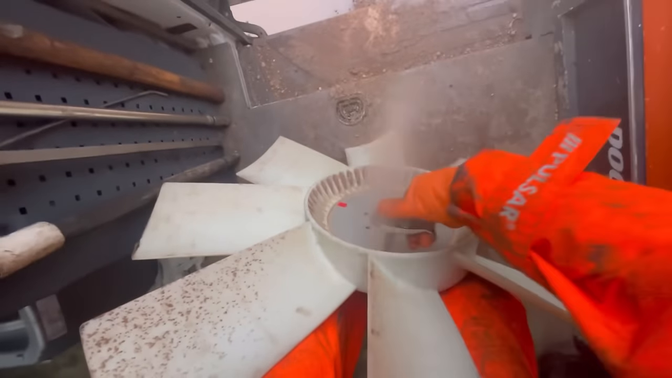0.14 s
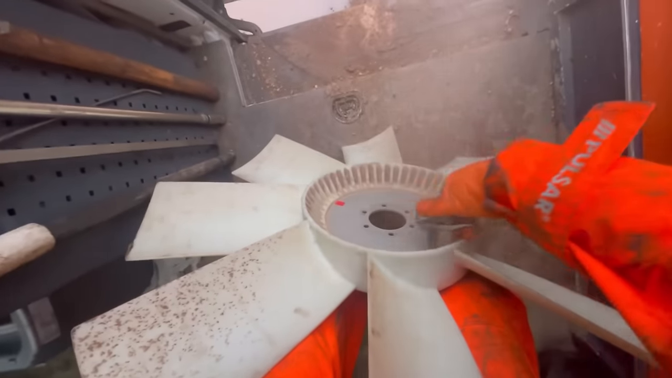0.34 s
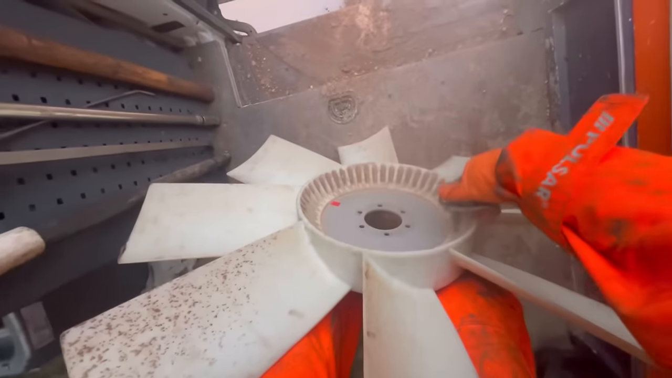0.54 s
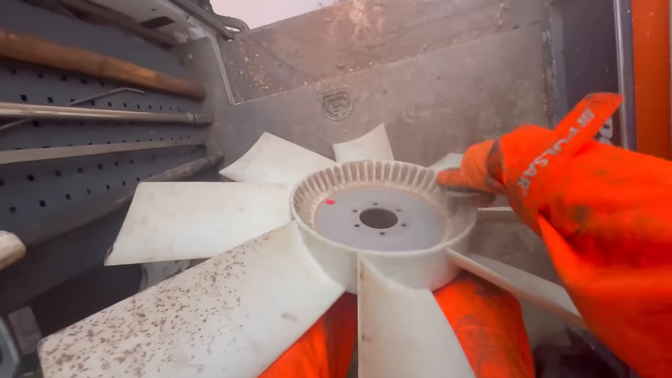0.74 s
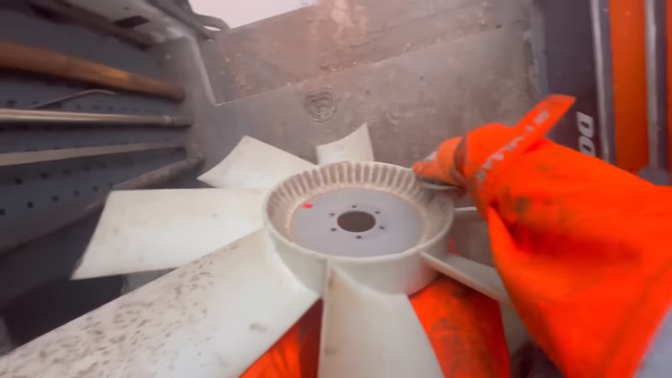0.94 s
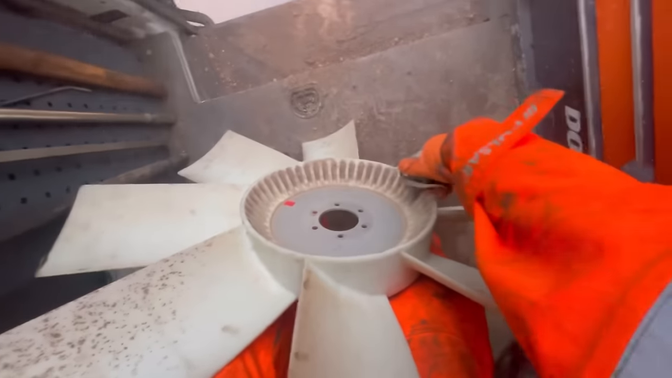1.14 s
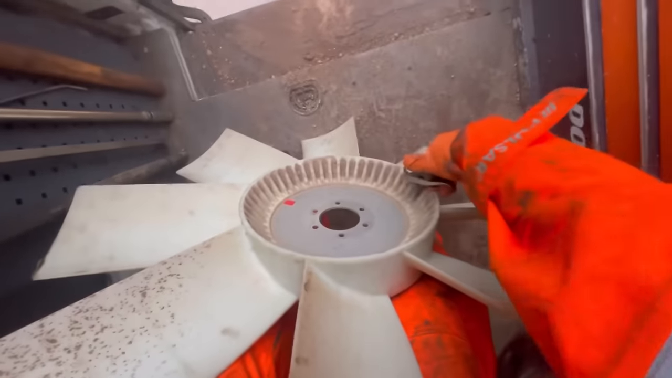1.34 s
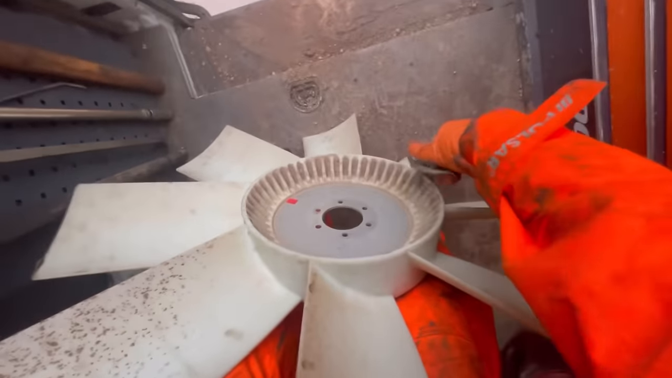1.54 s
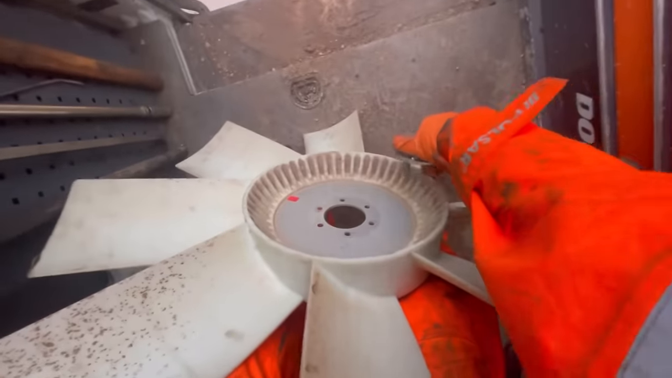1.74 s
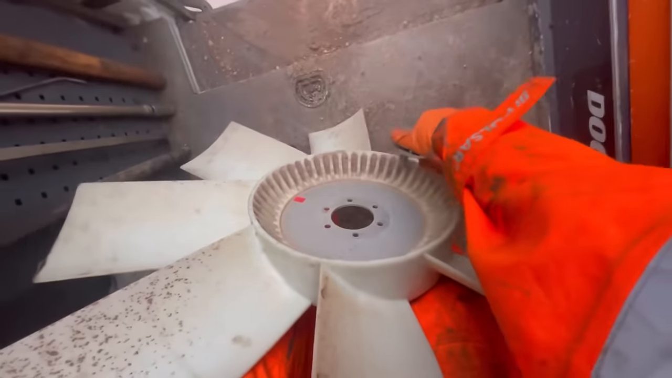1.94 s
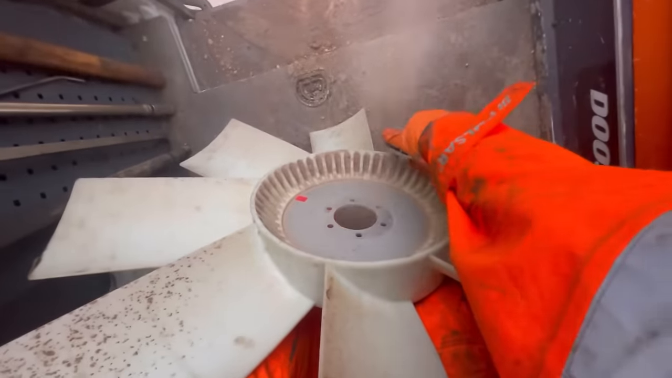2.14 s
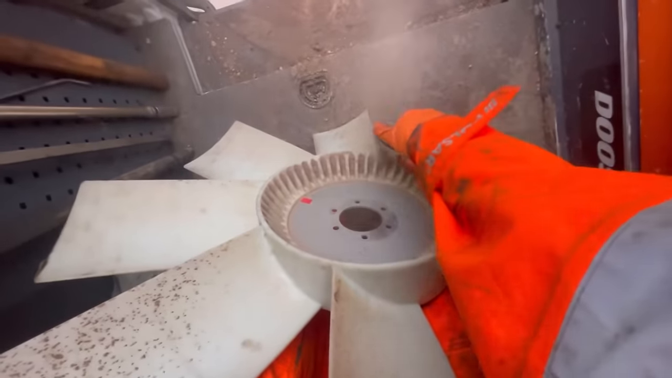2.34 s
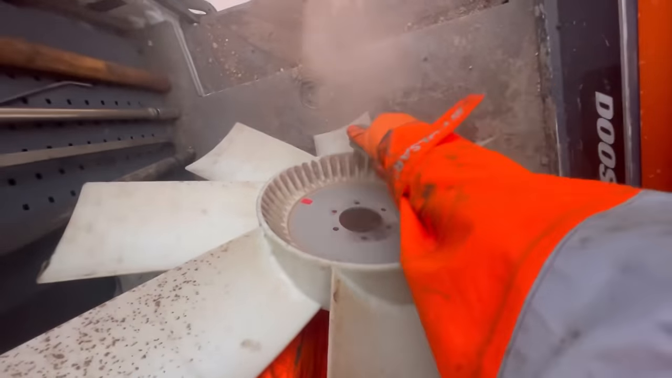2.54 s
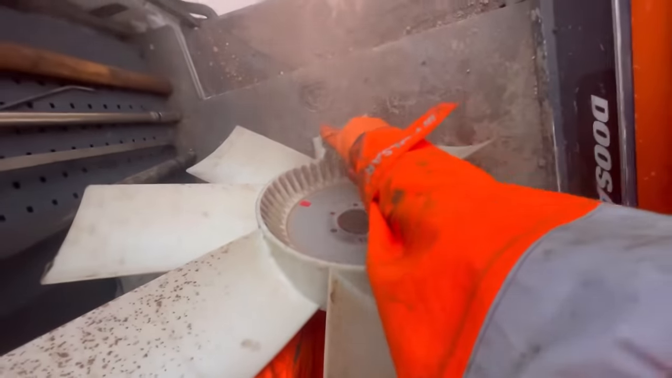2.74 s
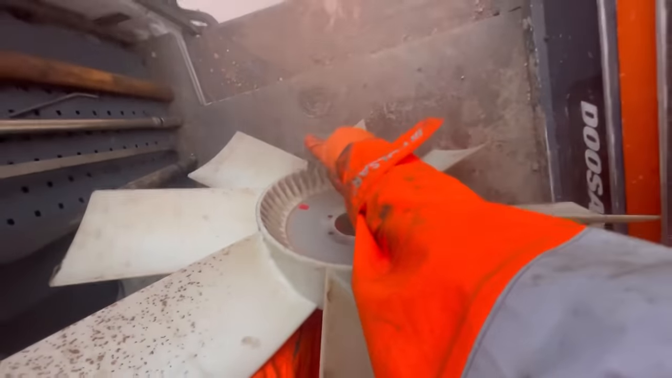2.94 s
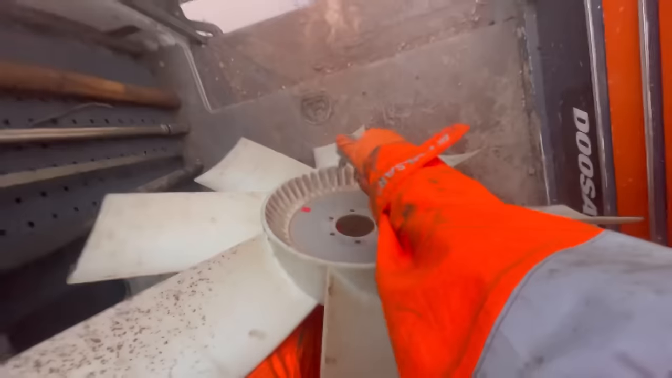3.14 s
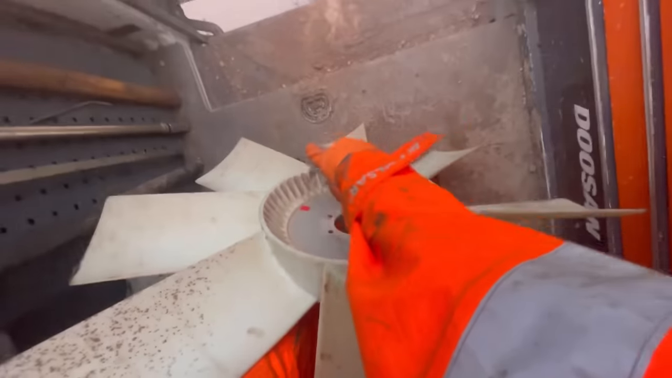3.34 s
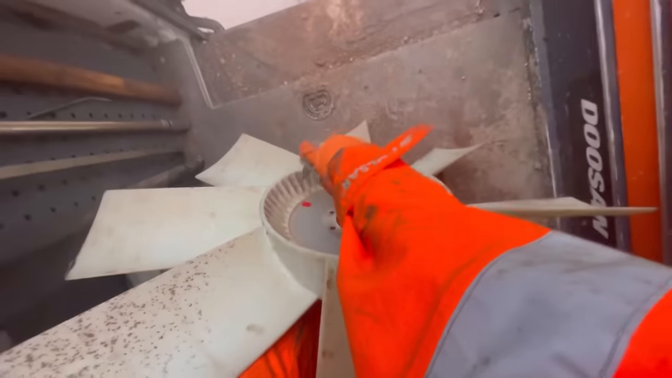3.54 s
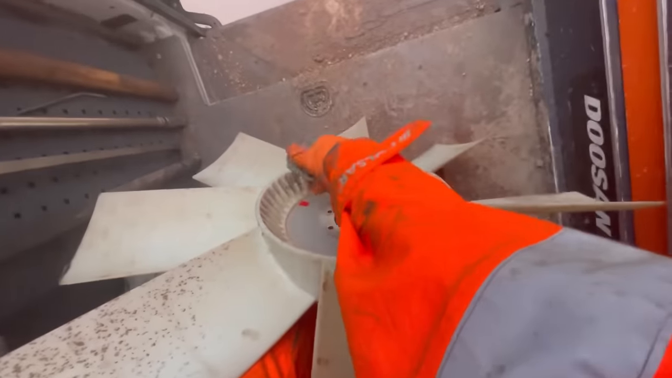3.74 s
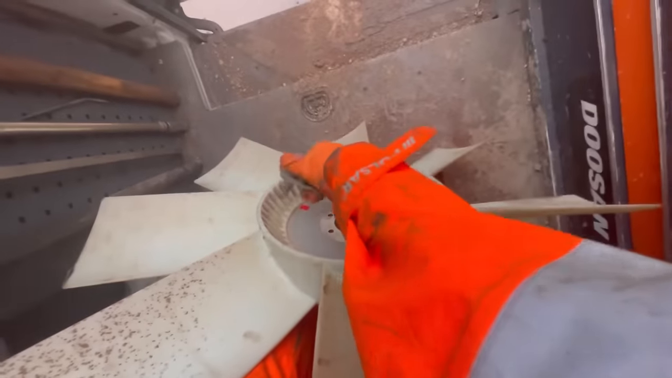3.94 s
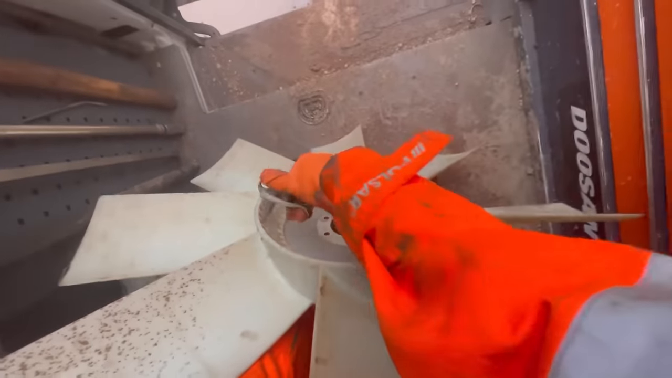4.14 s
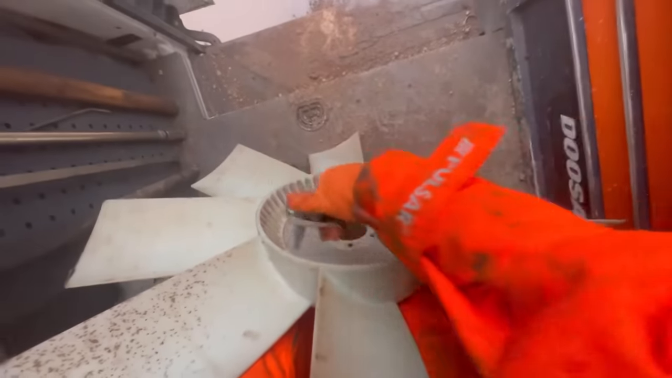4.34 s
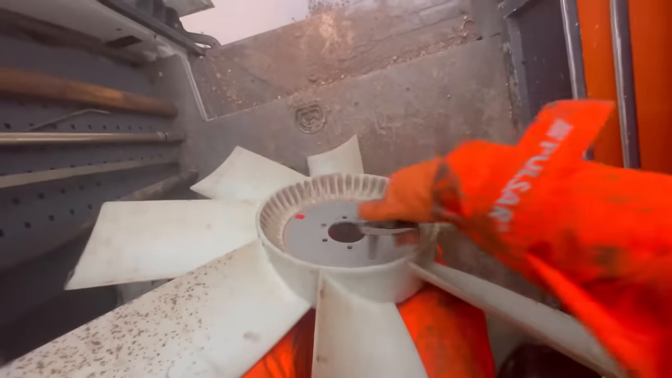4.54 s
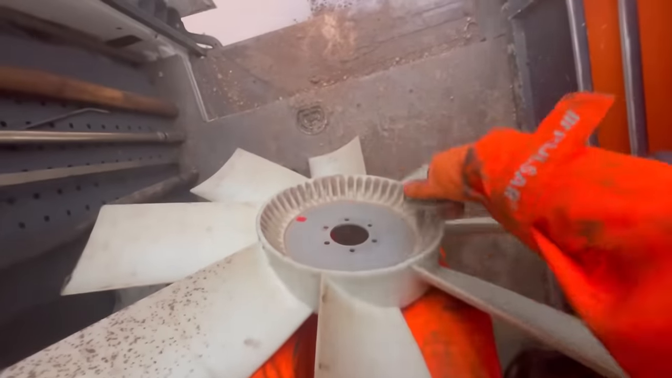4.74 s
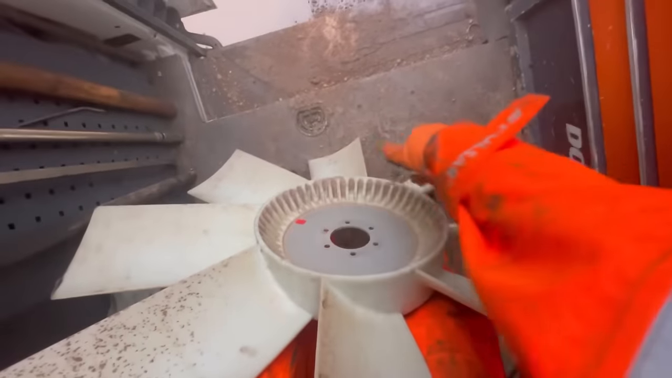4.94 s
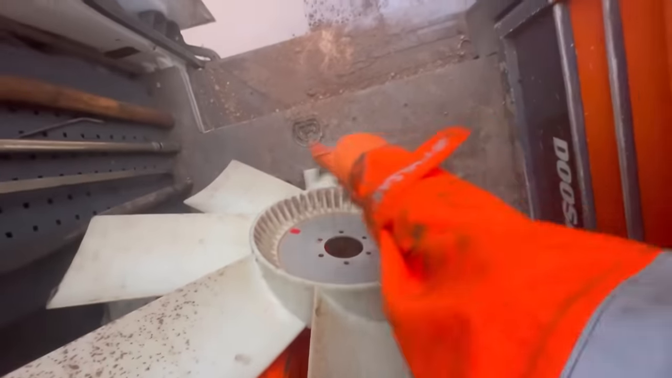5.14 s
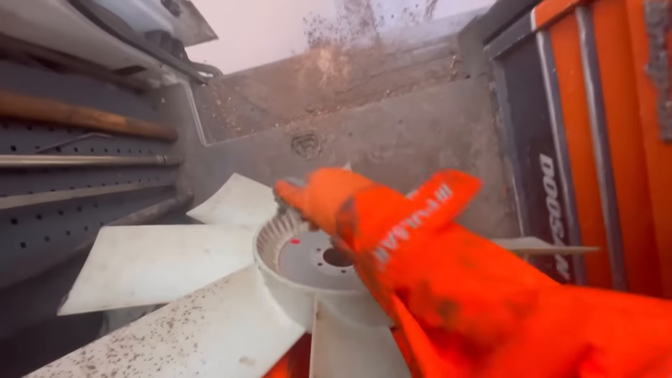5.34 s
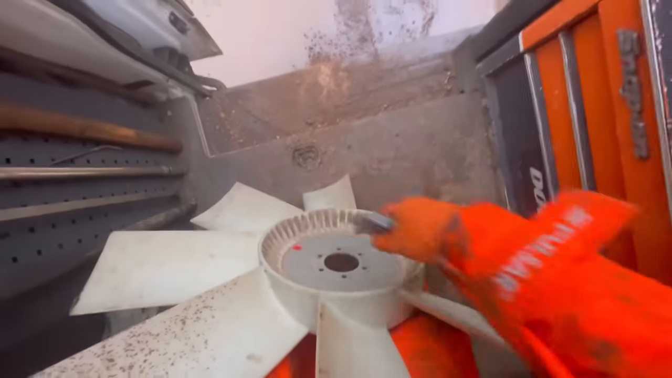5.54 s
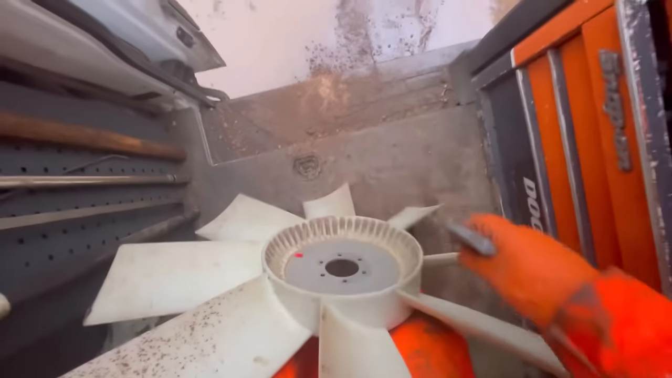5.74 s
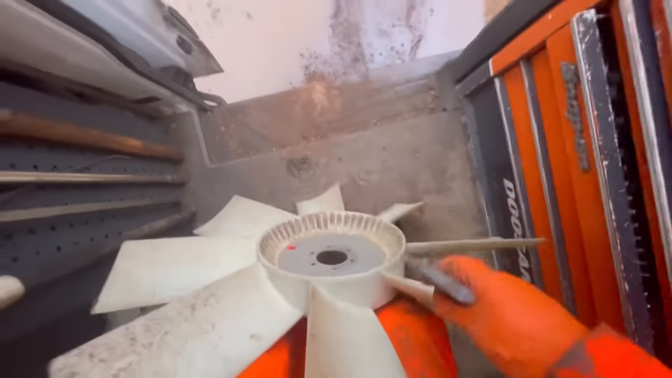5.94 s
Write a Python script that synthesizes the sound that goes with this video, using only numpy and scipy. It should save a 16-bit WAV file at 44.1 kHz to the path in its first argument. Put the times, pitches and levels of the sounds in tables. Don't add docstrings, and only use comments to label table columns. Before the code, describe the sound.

A compressed-air gun is already blowing at the start, close to a stereo microphone inside a small, hard-walled van. Until about 0.9 s the hiss is moderate, then stronger, rapidly chopped as the jet crosses the ribs of a plastic fan. From 0.9 to 1.5 s it is steadier, with whistly hollow colouring. Between 1.5 and 2.5 s it flutters and surges, loudest near 1.9 s, with low air thumps. It stays full and fizzy around 2.8 s, sinks to a duller roar near 3.2 s and swells again by 3.7 s. From 4 to 4.8 s it breaks into uneven bursts and hollow roars. A deep, throaty rush comes around 5.3 s before the valve snaps shut near 5.44 s. The remaining quiet holds a faint rattling engine idle and distant yard noise, with a dull knock at 5.85 s and a tiny click at 5.94 s.

```python
import sys
import numpy as np
from scipy import signal
from scipy.fft import rfft, irfft
from scipy.io import wavfile
from scipy.ndimage import uniform_filter1d

SR = 44100
rng = np.random.default_rng(int(sys.argv[2]) if len(sys.argv) > 2 else 0)


def to_linear_factor(level_db):
    exponent = np.asarray(level_db, float) / 20
    return 10 ** exponent


def to_wav(sig):
    pcm = np.clip(np.atleast_2d(sig), -1, 1) * 32767
    pcm = np.round(pcm).astype(np.int16)
    wavfile.write(sys.argv[1], SR, pcm.T)


N = 264641
SHUT_S = 5.44
# start t/s, end t/s, change of level/dB
RIBS = [(0.035, 0.071, -6.5), (0.096, 0.13, -7), (0.146, 0.167, -6), (0.395, 0.411, -3),
        (0.434, 0.443, -11.5), (0.529, 0.548, -11.5), (0.568, 0.604, -6.5), (0.641, 0.668, -8.5),
        (0.714, 0.736, -8), (0.777, 0.803, -10), (0.86, 0.89, -8), (1.522, 1.546, -6.5), (1.604, 1.625, -6),
        (1.696, 1.729, -5), (1.788, 1.848, -9), (1.901, 1.958, -8.5), (2.083, 2.129, -5),
        (2.198, 2.245, -6.5), (2.326, 2.347, -5.5), (2.497, 2.52, -5), (3.72, 3.8, -2.5),
        (3.92, 3.95, -2.5), (3.975, 3.986, -9), (4.048, 4.078, -2.5), (4.11, 4.129, -4.5),
        (4.15, 4.249, -5.5), (4.306, 4.338, -2), (4.58, 4.6, -4.5), (4.686, 4.692, -3.5),
        (4.719, 4.725, -8)]


def evened(x):
    return x / np.sqrt(np.mean(x ** 2) + 1e-20)


def read(points, hz):
    f, value = np.transpose(points)
    return np.interp(np.log(hz + 1), np.log(f + 1), value)


def gate(t, start, end, rise, fall):
    return (np.tanh((t - start) / rise) - np.tanh((t - end) / fall)) / 2


def bump(t, middle, half):
    return np.exp(-((t - middle) / half) ** 2)


def drift(shape, bins, frames):
    z = uniform_filter1d(rng.standard_normal(shape), max(round(bins), 1), 0)
    return evened(uniform_filter1d(z, max(round(frames), 1), 1))


def band(x, lo_hz, hi_hz):
    return signal.sosfilt(signal.butter(2, [lo_hz, hi_hz], "bandpass", fs=SR, output="sos"), x)


def housing(hz):
    # f/Hz, width/Hz, level/dB
    notches = [(5620, 230, -4), (7284, 256, -10.5), (7900, 87, -7), (9330, 150, -5.5), (900, 150, -3)]
    return sum(g * bump(hz, f, w) for f, w, g in notches)


def path_turn(hz):
    return 2 * np.pi * (hz - 10650) / 4800 * (hz > 8800)


def ports(db, turn):
    # f/Hz, likeness of the ports (0-1)
    likeness = [(800, 0.53), (1300, 0.42), (2000, 0.42), (8500, 0.64), (9400, 0.63), (10600, 0.72),
                (11800, 0.71), (13100, 1), (14300, .65), (15300, 0.97)]
    hz = np.fft.rfftfreq(1024, 1 / SR)[:, None]
    same = np.clip(read(likeness, hz), 0, 1)
    a, b, c, d = rng.standard_normal((db.shape[1], db.shape[0], 4)).T
    right = a + 1j * b
    apart = c + 1j * d
    left = (same * right + np.sqrt(1 - same ** 2) * apart) * np.exp(1j * turn)
    return signal.istft(np.array([left, right]) * to_linear_factor(db), nperseg=1024, noverlap=768)[1][:, :N]


def lean(pair, points):
    gain = to_linear_factor(read(points, np.fft.rfftfreq(2 * N, 1 / SR)))
    return np.array([irfft(rfft(pair[0], 2 * N) * gain)[:N], pair[1]])


def jet_colour(t, hz, depth, roar):
    # f/Hz, spectral level/dB
    colour = [(100, -35), (300, -35), (700, -19.5), (1050, -18.5), (1400, -11), (2800, -8.5), (3500, -5.5),
              (5000, -6), (6600, -1.5), (8200, -0.5), (10000, -1), (12300, 0.5), (14300, -4), (16000, -6)]
    # start t/s, end t/s, f/Hz, width/Hz, level/dB
    pockets = [(1.04, 1.43, 1440, 110, 11), (.98, 1.4, 3780, 70, 8.5), (1.33, 1.47, 3500, 130, 5),
               (.9, 2.05, 6700, 280, 3.5), (.9, 1.4, 11400, 980, 3.5), (4.05, 4.27, 640, 70, 15.5),
               (1.8, 2.6, 1200, 150, 7), (5.21, 5.38, 1400, 500, 8), (5.2, 5.38, 2400, 900, 8),
               (5.05, 5.14, 3500, 2500, -4), (0.86, 1.48, 4400, 380, -4), (.92, 1.3, 3100, 300, -2.5),
               (2.55, 2.85, 2800, 800, -5), (.55, 1.3, 860, 170, -8), (5.06, 5.13, 15000, 3000, 9),
               (2.7, 5.2, 2350, 200, 2), (2.95, 4.2, 1000, 250, 3), (0, .15, 1250, 200, 6),
               (.61, .88, 1800, 500, 4), (1.48, 1.56, 2400, 1500, -6), (4, 4.33, 1700, 600, -3.5),
               (1.6, 2.9, 10000, 5000, -1.5), (4.75, 4.9, 1400, 400, -5), (3.15, 4.02, 13000, 4000, 2)]
    # middle t/s, half length t/s, level/dB
    fills = [(0.508, 0.2, 6), (1.65, 0.1, 2.5), (1.944, 0.13, 9.5), (2.255, 0.071, 11), (3.026, 0.052, 3.5),
             (3.447, 0.16, 5.5), (3.84, 0.18, 5.5), (4.193, 0.086, 7), (4.42, .06, 8.5),
             (4.627, 0.11, 11.5), (4.904, .08, 1.5), (5.296, 0.25, 17.5), (5.5, 0.064, -2.5)]
    fill_db = sum(g * bump(t, m, half) for m, half, g in fills)
    body = (1 - roar) / (1 + (hz / 4600) ** 4)
    fizz = 1 / (1 + (9000 / (hz + 1)) ** 6) - .6 + 0.79 * (body + roar)
    db = read(colour, hz) + body * (14 * depth + .3 * fill_db)
    db += roar * (4.5 * depth + fill_db - 0.5)
    db += fizz * 4.5 * depth
    db += housing(hz)
    db += sum(g * bump(hz, f, w) * gate(t, a, b, .04, .02) for a, b, f, w, g in pockets)
    db += 1.2 * drift(db.shape, 10, 10) + 1.7 * drift(db.shape, 3, 30)
    db += 2.0 * roar * drift(db.shape, 25, 4)
    rib_db = sum(g * gate(t, a, b, 0.0057, 0.0061) for a, b, g in RIBS)
    return db + .5 / (1 + (hz / 2200) ** 3) * rib_db


def jet_level(t, level_db):
    # start t/s, end t/s, change of level/dB
    strikes = [(0.465, 0.5, -2.5), (0.877, 0.954, 2), (2.7, 2.8, -1), (1.408, 1.482, 1), (0.209, .22, -9),
               (1.98, 2.015, 2.5), (1.87, 1.89, 1.5), (2.024, 2.085, -7), (2.244, 2.325, 2),
               (2.281, 2.322, 2.5), (2.346, 2.48, 0), (2.588, 2.706, -3), (4.288, 4.304, 4),
               (4.328, 4.351, 4), (4.354, 4.363, -9), (4.359, 4.373, 2.5), (4.361, 4.391, 4.5),
               (4.394, 4.395, -13), (4.458, 4.475, -2), (4.6, 4.67, -2), (4.74, 4.753, 0),
               (4.769, 4.827, 2.5), (5.056, 5.115, 3), (5.088, 5.105, 1), (4.26, 4.29, -2.5),
               (4.35, 4.353, 1)]
    for start, end, change_db in RIBS + strikes:
        rise_s, fall_s = (.002, .006) if change_db > 0 else (.006, .003)
        slower_s = 0.18 * np.clip(end - start - .03, 0, .04)
        level_db = level_db + change_db * gate(t, start, end, rise_s + slower_s, fall_s + slower_s)
    level_db += 0.71 * drift((1, N), 1, 500)[0] + 0.72 * drift((1, N), 1, 60)[0]
    shut = np.maximum(t - SHUT_S, 0)
    bleed_db = np.minimum(-16.5 - 350 * (shut - .03), 0)
    return level_db + np.maximum(-609 * shut, bleed_db)


def jet():
    # t/s, hiss level/dB, depth into the hollows (0-1)
    aim = [(0.0, -29, 0.2), (.17, -30.5, 0.69), (.33, -36, 0.14), (.47, -32, 0.34), (.55, -22, 0.41),
           (1.0, -24.5, 0.76), (1.4, -24, 0.68), (1.87, -16.5, 0.18), (2.15, -23.5, 0.35),
           (2.75, -18, 0.31), (3.2, -30, 0.83), (3.7, -21.5, 0.28), (4.0, -23.5, 0.47), (4.2, -33, 0.69),
           (4.45, -25.5, 0.02), (4.78, -26, 0.18), (4.95, -31, 0.39), (5.43, -34.5, .5)]
    # f/Hz, left minus right level/dB
    left_colour = [(4900, -1), (5600, -6), (6100, -3), (6800, -3.5), (8000, -1.6), (10000, -0.5)]
    aim_s, hiss_db, aim_depth = np.transpose(aim)
    frame_t = np.arange(N // 256 + 5) * 256 / SR
    hz = np.fft.rfftfreq(1024, 1 / SR)[:, None]
    depth = np.interp(frame_t, aim_s, aim_depth) - .5
    roar = 1 / (1 + (hz / 1150) ** 6)
    db = jet_colour(frame_t, hz, depth, roar)
    mixed = 1 / (1 + (hz / 8800) ** 20) / (1 + (1000 / (hz + 1)) ** 8)
    turn = path_turn(hz) + 2.14 * mixed * drift(db.shape, 12, 90)
    pair = lean(ports(db, turn), left_colour)
    t = np.arange(N) / SR
    level_db = jet_level(t, np.interp(t, aim_s, hiss_db))
    return evened(pair) * to_linear_factor(level_db + 1.0)


def van(x):
    t = np.arange(SR // 4) / SR
    tail = rng.standard_normal((2, len(t))) * to_linear_factor(-60 * t / 0.082) * (t > .004)
    return signal.fftconvolve(x, tail / np.linalg.norm(tail[0]), axes=1)[:, :N]


def buffet():
    # middle t/s, half length t/s, thump level/dB, flutter level/dB
    gusts = [(0.054, .08, -71, -85), (0.7, .15, -65, -72), (1.17, 0.14, -66, -66.5), (1.51, .05, -56, -64),
             (1.63, 0.046, -50.5, -63.5), (1.793, 0.065, -51, -61), (2.002, 0.069, -55.5, -63),
             (2.124, .04, -67.5, -65), (2.346, 0.11, -67, -63), (2.8, .12, -80, -63),
             (3.702, 0.1497, -81, -73), (4.068, .06, -66, -59.5), (4.168, 0.023, -72, -65),
             (4.284, 0.053, -63, -63), (4.56, 0.23, -72, -77), (4.85, 0.17, -86, -69.5),
             (5.237, 0.031, -70, -58), (5.38, 0.042, -80, -64), (5.75, 0.046, -72, -87)]
    t = np.arange(N) / SR
    noise = rng.standard_normal((2, N)) * to_linear_factor(2.7 * drift((2, N), 1, 1300))
    thump = sum(to_linear_factor(db) * bump(t, s, half) for s, half, db, _ in gusts) * (t < SHUT_S)
    flutter = to_linear_factor(-75) + sum(to_linear_factor(db) * bump(t, s, half) for s, half, _, db in gusts)
    low = evened(band(band(noise[0], 45, 110), 45, 110))
    return thump * low + flutter * evened(band(noise[1], 130, 330))


def ticks():
    # t/s, level/dB, f/Hz, T60 t/s
    knocks = [
        (5.9393, -50, 6750, 0.0061),
        (5.849, -52, 370, .03),
    ]
    out, t = np.zeros(N), np.arange(2000) / SR
    for s, db, hz, t60 in knocks:
        onset = np.minimum(t * hz / 1.5, 1)
        ring = to_linear_factor(db - 60 * t / t60) * np.sin(2 * np.pi * hz * t) * onset
        out[round(s * SR):][:2000] += ring[:N - round(s * SR)]
    return out


def engine():
    # f/Hz, rms level/dB
    orders = [(44, -71.5), (65.5, -82.5), (76.7, -86.5), (87.8, -64), (99.8, -70.5), (110, -85.5),
              (131.9, -73.5), (144, -85.5), (176, -84.5), (722, -81.5), (991, -80)]
    # f/Hz, width/Hz, level/dB
    panels = [(715, 33, -83), (860, 260, -76), (983, 50, -82), (440, 170, -80.5), (1350, 110, -90)]
    t = np.arange(N) / SR
    wander = t + .0002 * drift((1, N), 1, 20000)[0]
    hum = np.zeros(N)
    for hz, db in orders:
        level_db = db + 2.4 * (t > 5.5) + 0.59 * drift((1, N), 1, 6000)[0]
        hum += to_linear_factor(level_db) * np.sqrt(2) * np.sin(2 * np.pi * (hz * wander + rng.random()))
    firings = 21.95 * wander + .1
    strokes = np.diff(np.floor(firings), prepend=0)
    knocks = evened(strokes * to_linear_factor(1.2 * rng.standard_normal(N)))
    rattle = (.5 + np.exp(-(firings % 1) / 0.3007)) * rng.standard_normal(N)
    knocks += 1.3 * rattle
    clatter = np.zeros(N)
    for hz, w, db in panels:
        panel = band(band(knocks, hz - w / 2, hz + w / 2), hz - w, hz + w)
        clatter += to_linear_factor(db) * evened(panel)
    return hum + clatter


def yard():
    # f/Hz, spectral level/dB
    far_colour = [(150, -107), (600, -101), (1100, -103), (1600, -107), (3300, -111), (5000, -109),
                  (5500, -113), (6100, -105), (7000, -105), (8000, -114), (10000, -120), (12700, -113),
                  (14000, -119), (15700, -128)]
    # f/Hz, left minus right level/dB
    far_left_colour = [(500, -4), (900, -7), (2500, -2), (3800, -5), (6500, -15.5), (7300, -7), (8500, 0.5)]
    hz = np.fft.rfftfreq(1024, 1 / SR)[:, None]
    db = read(far_colour, hz) + housing(hz)
    db = db + .8 * drift((513, N // 256 + 5), 10, 20)
    turn = path_turn(hz) + 1.5 * (hz > 1100) * (hz < 8800)
    return to_linear_factor(-68) * lean(evened(ports(db, turn)), far_left_colour)


def scene():
    air, low = jet(), buffet() + engine()
    apart = to_linear_factor(-2) * (np.roll(low, 9000) - .4 * low) * np.array([[1], [-1]])
    return air + to_linear_factor(-9.0) * van(air) + low + apart + ticks() * to_linear_factor([[-5], [2]]) + yard()


def low_pass(x):
    return signal.sosfilt(signal.butter(12, 17080, fs=SR, output="sos"), x)


def record(dry):
    # t/s, f/Hz
    mono_bass = [(.92, 3.8), (1.0, 370), (1.15, 740), (1.45, 890), (2.5, 1040), (5.4, 917), (5.55, 740)]
    sum_lost_hz, difference_lost_hz = (12700, 13850), (10330, 10980)
    halves = np.array([dry[0] + dry[1], dry[0] - dry[1]]) / 2
    hz, t, z = signal.stft(halves, SR, nperseg=2048, noverlap=1024)
    col = hz[:, None]
    step = 172 * np.round(drift((5, len(t)), 1, 2) * [[.8], [1.2], [.6], [.4], [1.3]])
    z[0] *= (col < sum_lost_hz[0] + step[0]) | (col > sum_lost_hz[1] + np.maximum(step[1], -172))
    z[1] *= (col < difference_lost_hz[0] + step[2]) | (col > difference_lost_hz[1] + step[3])
    z[1] *= col < 14950 + step[4]
    z[1] *= col >= np.interp(t, *np.transpose(mono_bass)) * (1 + step[2] / 1500)
    band_hz = col[:1024:8]
    top = band_hz > sum_lost_hz[1]
    power = abs(z[:, :1024].reshape(2, 128, 8, -1) ** 2).sum(2)
    power = uniform_filter1d(power, 2, 2)
    kept = power > to_linear_factor(2 * -8.5) * power[::-1]
    around = uniform_filter1d(power.sum(0), 9, 0)
    kept &= power > to_linear_factor(2 * -11 + 2 * 5 * top) * around
    kept[0] &= (rng.random(around.shape) > .17) | (band_hz < sum_lost_hz[1])
    z[:, :1024] *= np.repeat(kept | (band_hz < 2000), 8, 1)
    mid, side = signal.istft(z * (col < 15760), SR, nperseg=2048, noverlap=1024)[1][:, :N]
    return low_pass(np.array([mid + side, mid - side]))


dry = scene()
out = record(dry)
to_wav(out)
```